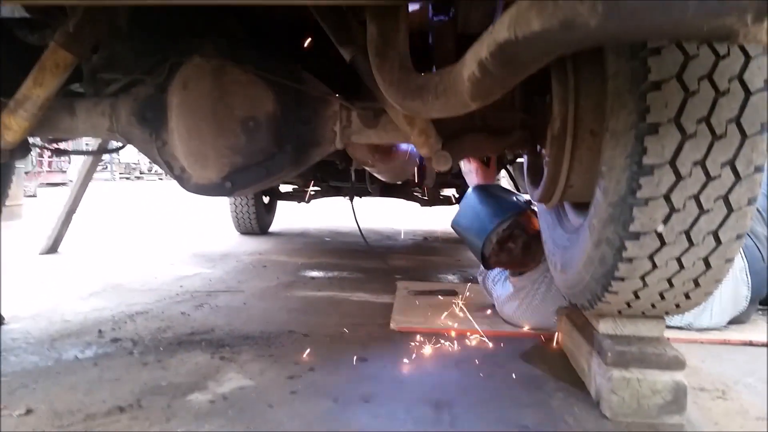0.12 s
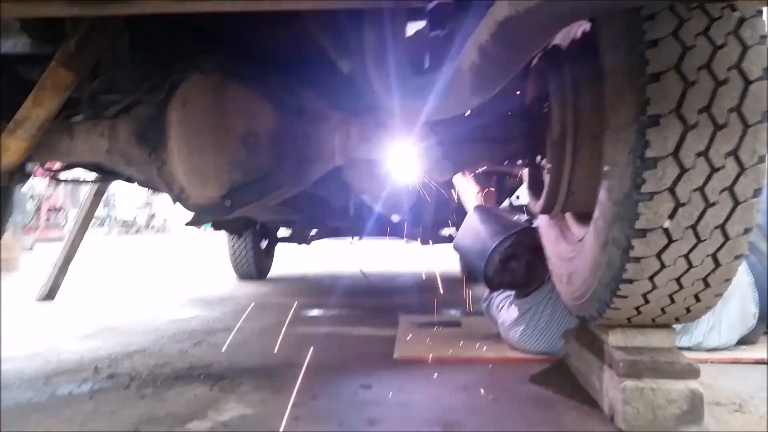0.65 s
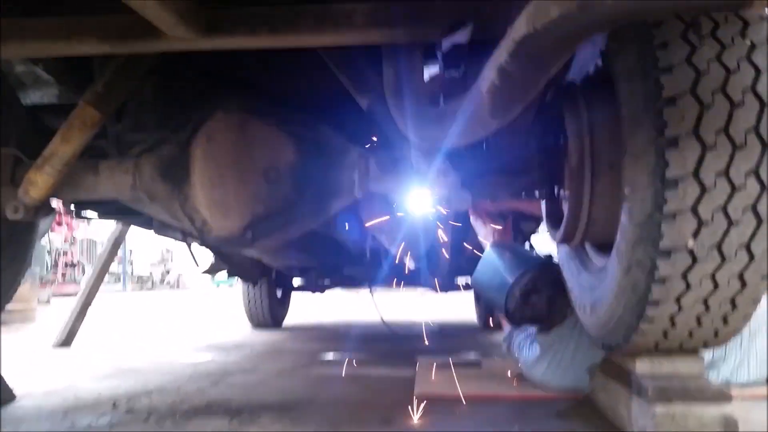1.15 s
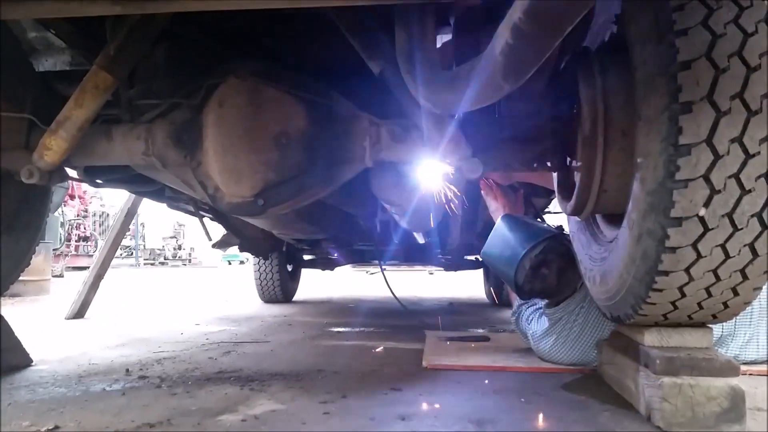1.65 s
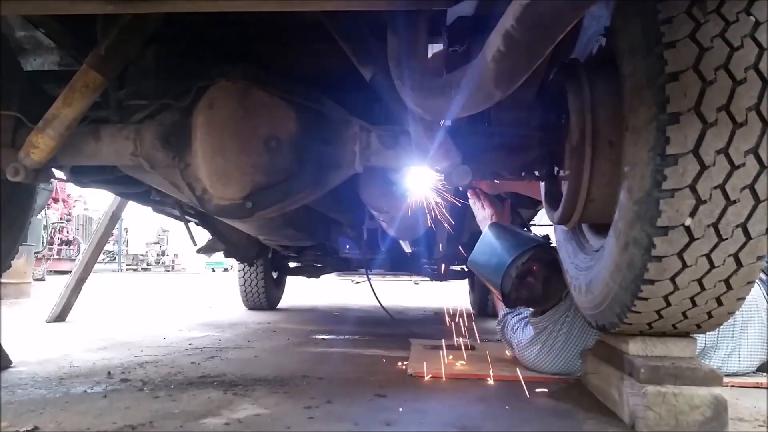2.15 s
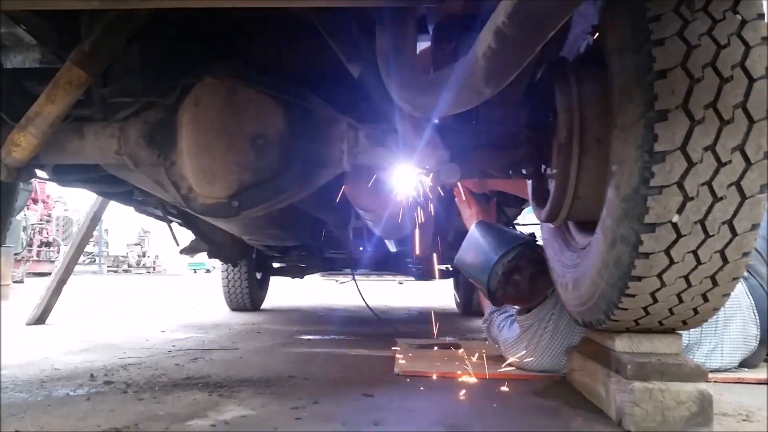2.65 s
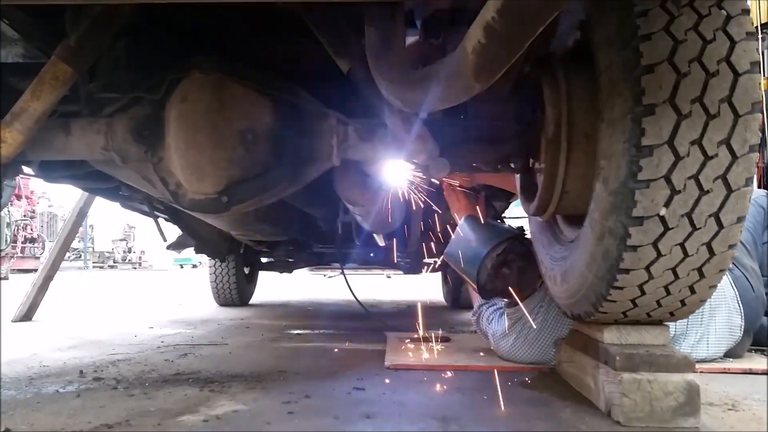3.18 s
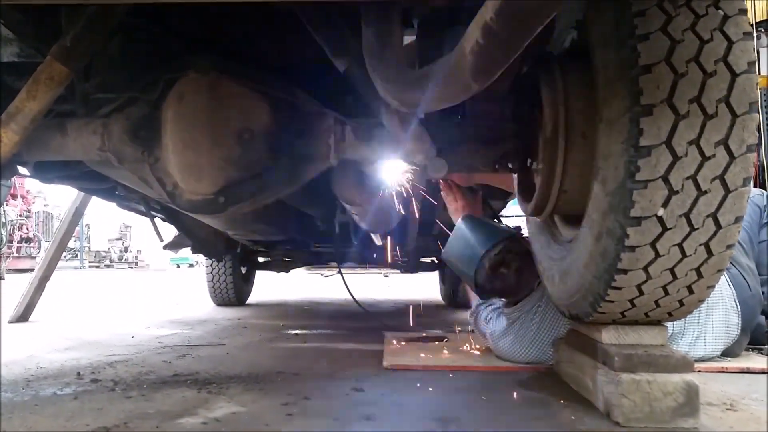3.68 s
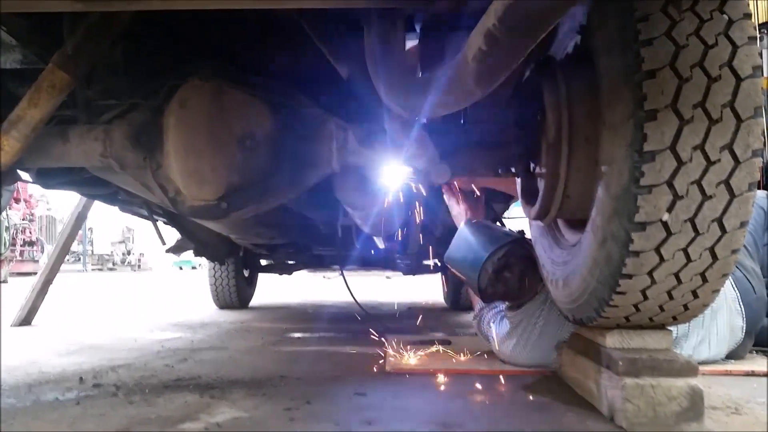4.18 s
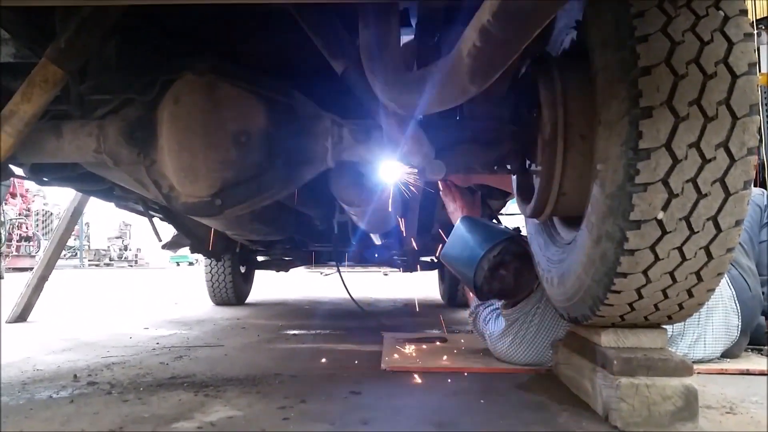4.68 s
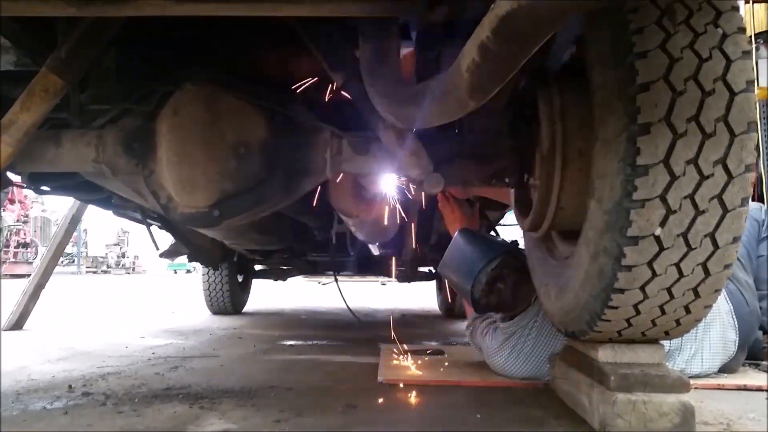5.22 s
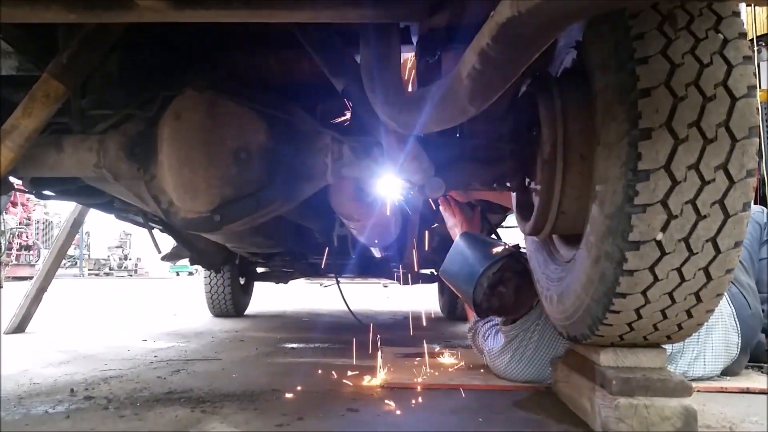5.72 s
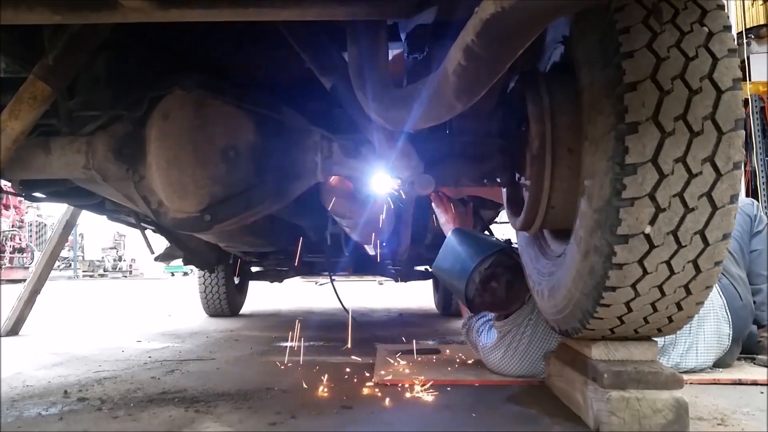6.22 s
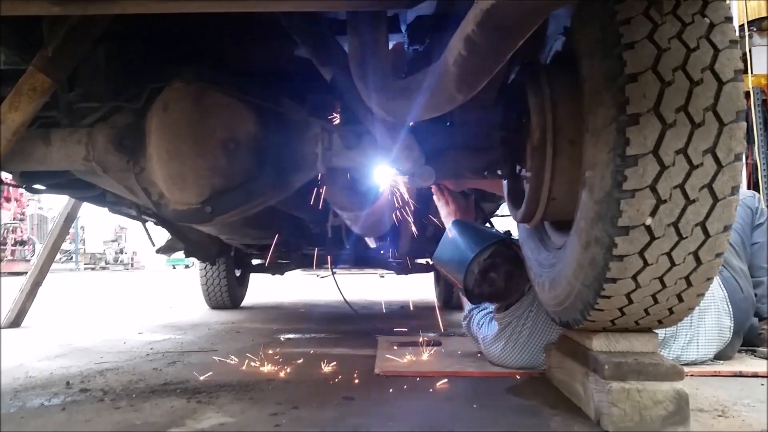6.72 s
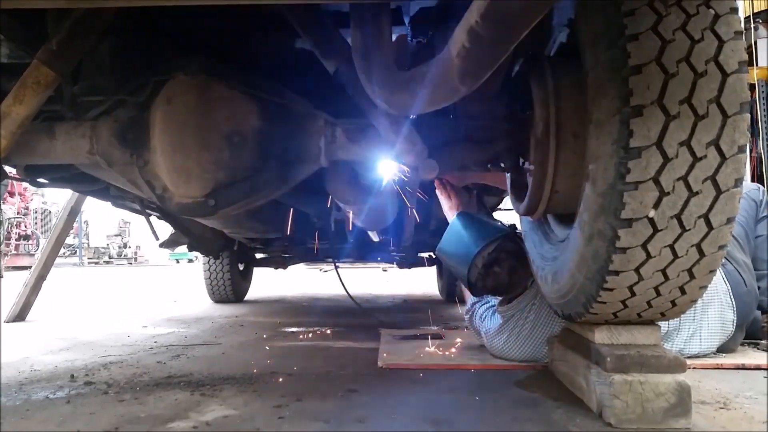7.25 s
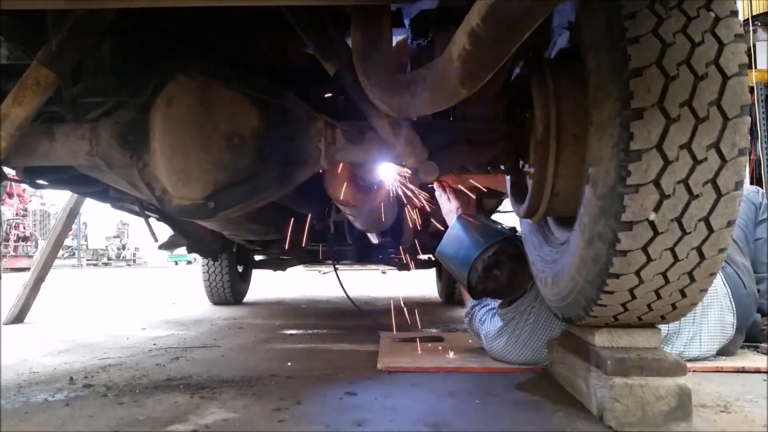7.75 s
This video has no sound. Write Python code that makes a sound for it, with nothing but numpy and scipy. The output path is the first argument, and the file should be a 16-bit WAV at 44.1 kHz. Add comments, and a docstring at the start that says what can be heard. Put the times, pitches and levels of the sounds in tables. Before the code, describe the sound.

An electric arc welds a steel pipe beneath a vehicle. A sizzling, frying hiss opens, quickly joined by irregular sharp snaps over dense, buzzing crackle. The arc dips for an instant before many snaps, then bursts back. Floor and chassis return short ragged echoes. The close stereo pickup is very bright and loud on the right, more muffled on the left, with soft air rumble and puffs early on; a yard murmurs very faintly behind.

```python
"""A sizzling, frying hiss comes first, soon cut by sharp snaps: an electric arc welds a steel pipe under a vehicle.
The snaps, small drops and crackle are pulses, the hiss and frying are shaped noise with wandering level and colour;
floor and chassis throw every pulse back as a burst of decaying noise. The right microphone port is bright and loud,
with low membrane ticks and brief smears of band noise; the left is muffled, with air puffs, rumble, soft buffets and
a hollow band. A faint murmur of yard and workshop lies behind; weak bands drop out and leave holes."""
import sys
import numpy as np
from scipy import signal
from scipy.fft import rfft, irfft, next_fast_len
from scipy.io import wavfile
from scipy.ndimage import uniform_filter1d, minimum_filter1d, map_coordinates

SR = 44100
rng = np.random.default_rng(int(sys.argv[2]) if len(sys.argv) > 2 else 0)


def inscribe(sig):
    """Save sig as 16-bit PCM at rate SR to the path in sys.argv[1].

    A 1-D sig is mono; a 2-D sig holds one channel per row.
    Samples are clipped to [-1, 1] before scaling.
    """
    pcm = np.round(np.clip(np.atleast_2d(sig).T, -1, 1) * 32767)
    wavfile.write(sys.argv[1], SR, pcm.astype(np.int16))


def field_ratio(decibels):
    """Amplitude ratio for a level in dB (20 dB per decade); scalars and array-likes work."""
    return 10 ** (np.asarray(decibels, dtype=float) / 20)


N = 347067  # samples

# Re-strikes of the arc: t/s, relative level/dB, length of the short circuit just before/s,
# level of the low kick on the right membrane/dB
RESTRIKES = [(0.179, -11, 0.022, -38), (0.2578, -8, 0.08, -46), (0.35, -7, 0.019, -39.5),
             (0.5183, -14.5, 0.023, -38), (0.633, -10, 0.0, -43), (0.6532, -5, 0.018, -32),
             (0.7335, -11.5, 0.043, -37), (0.7722, -12, 0.0, -42), (0.8946, -11.5, 0.088, -43),
             (0.9485, -2.5, 0.029, -22.5), (1.0767, -16, 0.035, -44.5), (1.0991, -10, 0.051, -55),
             (1.1334, -3.5, 0.036, -27.5), (1.2073, -9.5, 0.036, -35), (1.2888, -12.5, 0.069, -63),
             (1.6233, -10.5, 0.03, -37), (1.6718, -13.5, 0.023, -34.5), (1.7571, -5.5, 0.024, -35.5),
             (1.7752, -10.5, 0.044, -31.5), (1.811, -9, 0.023, -34), (1.9158, -1.5, 0.0016, -21.5),
             (1.9472, -12.5, 0, -31.5), (1.9553, -8, 0.0034, -25.5), (1.9887, -8, 0, -24.5),
             (2.026, -21, 0.031, -24.5), (2.0523, -9.5, 0.011, -48), (2.174, -5, 0.073, -36.5),
             (2.2262, -7, 0.026, -28), (2.2747, -4.5, 0.066, -26.5), (2.4102, -14, 0.05, -45),
             (2.4628, -1, 0.04, -23), (2.519, -12, 0.022, -44), (2.5372, -14, 0.019, -29.5),
             (2.5667, -8, 0.018, -24.5), (2.7047, -8, 0.0, -24.5), (2.7306, -7, 0.017, -28.5),
             (2.7737, -4, 0.077, -24), (2.8311, -3.5, 0.038, -24.5), (2.907, -14, 0.054, -41),
             (3.0697, -8, 0.023, -61), (3.127, -11.5, 0.035, -62), (3.187, 1.5, 0.061, -28.5),
             (3.231, -17, 0.015, -34.5), (3.264, -10, 0.032, -34.5), (3.2723, -4, 0.03, -34),
             (3.348, -9, 0.014, -53), (3.3594, -11.5, 0, -32), (3.3836, -2.5, 0.0056, -31.5),
             (3.4004, -7.5, 0.014, -26.5), (3.416, -7, 0, -35.5), (3.4256, -5, 0.068, -33),
             (3.4588, -8, 0.019, -30), (3.6649, -2.5, 0.085, -25.5), (3.7364, -14.5, 0.043, -52),
             (3.7609, -10.5, 0.02, -57), (3.817, -0.5, 0.038, -40), (3.8582, 3.5, 0.035, -19.5),
             (4.0434, -11, 0.015, -26), (4.0567, -3.5, 0.015, -30), (4.0999, -3.5, 0.0, -25),
             (4.1596, -6, 0.011, -49), (4.194, -9, 0.0063, -31.5), (4.2225, -1, 0.044, -30),
             (4.2494, -5, 0.055, -32), (4.3011, -13.5, 0.015, -67), (4.444, -4.5, 0.013, -25),
             (4.5184, -1, 0.03, -48), (4.7177, -13, 0.04, -59), (4.7881, -6.5, 0.084, -55),
             (4.812, -4.5, 0.025, -61), (5.0049, -10, 0.029, -41), (5.1843, -6, 0.03, -47),
             (5.3953, -9, 0.025, -30.5), (5.4551, -20, 0.034, -49.5), (5.501, -6, 0.033, -25.5),
             (5.5519, -4.5, 0.023, -19), (5.6179, -9.5, 0.024, -48), (5.6413, -3.5, 0.02, -28.5),
             (5.6846, -6.5, 0.021, -31.5), (5.7744, -5.5, 0.0025, -30), (5.8205, -6.5, 0.0, -27.5),
             (5.9601, -11.5, 0.035, -35.5), (6.055, -11.5, 0.034, -47), (6.1247, -6, 0.0025, -51),
             (6.2357, -7.5, 0, -31), (6.345, -13.5, 0, -36), (6.5596, -17, 0.032, -32),
             (6.6486, -9, 0.016, -29.5), (6.6875, -5, 0.011, -19), (6.701, -12, 0.0096, -26.5),
             (6.7172, -6.5, 0.054, -21), (6.793, -7, 0.03, -21), (6.8031, -5.5, 0.0082, -20.5),
             (6.9286, -13.5, 0.021, -56.5), (7.0046, -13, 0.019, -50), (7.4088, -16, 0.011, -48),
             (7.4369, -14.5, 0.04, -34.5), (7.5087, -6.5, 0.023, -39), (7.5722, -7.5, 0.05, -27),
             (7.6074, -16.5, 0.025, -54), (7.6495, -17, 0.017, -52), (7.6786, -6, 0.052, -25),
             (7.758, -12.5, 0.053, -46), (7.808, -11, 0.048, -41)]
# Duller spitting of the molten pool: t/s, relative level/dB
POOL_SPITTING = [(0.0, -31.5), (1.22, -89), (1.75, -37), (3.09, -55), (3.42, -31.5), (3.68, -48.5),
                 (4.21, -39.5), (6.25, -39.5), (7.3, -29), (7.87, -31.5)]


def unit(x):
    """Scaled to rms 1."""
    return x / np.sqrt(np.mean(x ** 2) + 1e-20)


def curve(rows):
    """One value per sample, by straight lines between (t/s, value) rows."""
    return np.interp(np.arange(N) / SR, *np.transpose(rows))


def wobble(rate):
    """A smooth random curve with this many knots a second."""
    knots = rng.standard_normal(int(N * rate / SR) + 4)
    return map_coordinates(knots, [np.arange(N) * rate / SR])


def coloured(x, points):
    """Causal (minimum-phase) filter through the given (f/Hz, gain/dB) points."""
    m = 2 * next_fast_len(N // 2 + 4096)
    f, db = np.transpose(points)
    log_hz = np.log(np.fft.rfftfreq(m, 1 / SR) + 1)
    cepstrum = irfft(np.log(field_ratio(np.interp(log_hz, np.log(f), db))), m)
    # folding the cepstrum onto positive time gives minimum phase
    cepstrum[1:m // 2] *= 2
    cepstrum[m // 2 + 1:] = 0
    return irfft(rfft(x, m) * np.exp(rfft(cepstrum)), m)[:N]


def spikes(s, size):
    """One-sample pulses at times s in seconds."""
    return np.bincount((np.asarray(s) * SR).astype(int), size, N + SR)[:N]


def patchy(depth_db):
    """Noise at rms 1 whose colour shifts in patches of time and pitch."""
    z = signal.stft(rng.standard_normal(N), nperseg=256)[2]
    field = uniform_filter1d(rng.standard_normal(z.shape), 5, 0)  # across pitch
    field = uniform_filter1d(field, 30, 1)  # along time
    return unit(signal.istft(z * field_ratio(depth_db * unit(field)), nperseg=256)[1][:N])


def band(x, hz, width_hz):
    """Noise x through one resonance applied twice, at rms 1."""
    b, a = signal.iirpeak(hz, hz / width_hz, SR)
    once = signal.lfilter(b, a, x)
    return unit(signal.lfilter(b, a, once))


def workshop():
    """The distant murmur of yard and workshop: separate patchy noise at each port."""
    # Colour of the murmur: f/Hz, relative level/dB
    yard_colour = [(25, -32), (130, 4.5), (250, 4), (500, -35), (800, -3.5), (1900, -49.5), (2600, -48),
                   (5000, -20), (9000, -41)]
    return np.array([field_ratio(db) * unit(coloured(patchy(depth_db=4.0), yard_colour)) for db in (-62, -68)])


def rumble():
    """Uneven low rumble of air at the left port: bass-heavy noise with a random swell."""
    # Strength of the rumble: t/s, level/dB
    breeze = [(0.0, -60), (0.46, -59), (0.99, -50), (1.75, -63.5), (2.04, -59.5), (3.03, -61), (4.2, -64),
              (4.7, -58.5), (5.0, -61), (5.81, -65), (7.15, -49), (7.87, -64)]
    low = coloured(rng.standard_normal(N), [(30, -10.5), (90, -1.5), (300, -9), (600, -34.0)])
    return field_ratio(curve(breeze)) * unit(field_ratio(2.44 * wobble(12)) * low)


def puffs():
    """Puffs of air press the left membrane out and back: a quickly fading swing at 190 Hz."""
    # Air puffs at the left port: t/s, peak level/dB
    gusts = [(0.818, -32), (0.888, -34), (0.933, -24.5), (0.979, -36), (1.042, -21.5), (1.114, -25.5),
             (1.175, -19), (1.571, -31), (1.972, -30)]
    s, db = np.transpose(gusts)
    t = np.arange(SR // 20) / SR
    swing = np.sin(2 * np.pi * 190 * t) * t / 0.0017 * np.exp(1 - t / 0.001)
    return signal.fftconvolve(spikes(s, field_ratio(db)), swing / swing.max())[:N]


def drone():
    """A hollow band on the left: resonant noise with a wavering level."""
    # Strength of the hollow band: t/s, level/dB
    hollow = [(0, -59), (2.0, -68.5), (6.4, -89), (7.3, -63)]
    waver_db = 2.5 * wobble(14)
    return field_ratio(curve(hollow) + waver_db) * band(rng.standard_normal(N), hz=725, width_hz=440)


def buffets():
    """Soft buffets: a few slow swings of the left membrane that swell and fade."""
    # Buffets on the left port: t/s, level/dB, f/Hz
    swings = [(4.671, -43, 90.5), (6.347, -40, 72), (6.786, -38.5, 64.6)]
    cycles = 3.4
    out = np.zeros(N)
    for s, db, hz in swings:
        turns = np.arange(round(cycles * SR / hz)) * hz / SR
        swell = np.sin(np.pi * turns / cycles)
        out[round(s * SR):][:len(turns)] += field_ratio(db) * np.sin(2 * np.pi * turns) * swell
    return out


def smears():
    """Brief smears of band noise on the right, each resonant noise around its own pitch."""
    # Smears on the right: t/s, length/s, f/Hz, level/dB
    smear_rows = [(1.914, .015, 260, -41.5), (2.039, 0.028, 610, -45), (3.304, 0.029, 1690, -47),
                  (3.457, 0.039, 5150, -45)]
    width = .6  # bandwidth over pitch
    out = np.zeros(N)
    for s, length_s, hz, db in smear_rows:
        n = round(length_s * SR)
        noise = band(rng.standard_normal(SR // 8), hz, width * hz)[-n:]
        out[round(s * SR):][:n] += field_ratio(db) * noise * signal.windows.tukey(n, .4)
    return out


def ticks():
    """Snaps kick the right membrane: a short low tick, mostly inward, with a ragged body; faint ticks join the frying."""
    # Colour of one tick: f/Hz, relative level/dB
    tick_colour = [(40, 8), (200, 7.5), (2000, 4), (2900, -9.5), (8500, -7), (10000, -22)]
    late_s = 0.0005  # the membrane follows the snap late
    rattle_db, rattle_t60_s = -22.5, 0.035  # ragged body relative to the kick
    faint_db = -3.5  # relative to the frying curve
    s, _, _, db = np.transpose(RESTRIKES)
    sign = np.where(rng.random(len(s)) < .7, -1, 1)
    kicks = spikes(s + late_s, sign * field_ratio(db))
    fading = field_ratio(rattle_db - 60 * np.arange(SR // 20) / SR / rattle_t60_s)
    body = signal.fftconvolve(abs(kicks), fading)[:N]
    rattle = body * rng.standard_normal(N) * field_ratio(4.12 * wobble(500))
    when, size = rng.random((2, 1600))
    clumps_db = 5 * wobble(25)
    faint = spikes(when * N / SR, size - .6) * field_ratio(curve(POOL_SPITTING) + faint_db + clumps_db)
    one = coloured(spikes([0], [1]), tick_colour)
    return coloured(kicks + rattle + faint, tick_colour) / abs(one).max()


def burning():
    """Relative level of the arc in dB: it sinks during each short circuit and is back at once with the snap."""
    # Steady burning as the hand moves along the joint: t/s, relative level/dB
    steady = [(0, -25.5), (.53, -32), (.8, -30), (1.36, -34), (1.6, -30), (1.9, -31), (2.1, -30),
              (2.85, -32), (3.1, -31.5), (3.4, -23.5), (3.7, -35), (4.0, -32.5), (4.43, -29.5), (5.2, -30),
              (5.5, -32.5), (6.1, -34.5), (6.9, -32), (7.4, -33.5), (7.87, -25.5)]
    fade_db_per_s, depth_db = 610, 11.5  # how fast and how far a shorted arc sinks
    lost_db = np.zeros(N)
    for s, _, short_s, _ in RESTRIKES:
        k = np.arange(round((s - max(short_s, 0)) * SR), round(s * SR))
        lost_db[k] = np.minimum(depth_db, fade_db_per_s * np.arange(len(k)) / SR)
    return curve(steady) - lost_db


def small_drops():
    """Small drops leave the wire: a loosely timed train of pulses that fills the time between the snaps."""
    # Stretches in which the drops come at the rate of the current ripple: start t/s, end t/s
    locked_spans = [(.53, .65), (1.39, 1.5), (1.74, 1.9), (2.3, 2.37), (5.36, 5.45), (6.35, 6.49)]
    drop_hz, ripple_hz = 63.75, 2 * 59.9  # nominal rates
    scatter_s, drop_db, spread_db = 0.001, 16.5, 3.5  # timing scatter; level over the burning and its spread
    snap_s = np.transpose(RESTRIKES)[0]
    late, more = rng.standard_normal((900, 2)).T
    t = np.arange(N) / SR
    locked = np.any([(t > a) & (t < b) for a, b in locked_spans], axis=0)
    turns = np.cumsum(np.where(locked, ripple_hz, drop_hz)) / SR
    marks = np.interp(np.r_[0, snap_s, N / SR], t, turns)
    # whole beats between snaps, so that every snap falls on a beat of the train
    beats = np.r_[0, np.cumsum(np.maximum(1, np.round(np.diff(marks))))]
    small = np.setdiff1d(np.arange(beats[-1]), beats).astype(int)
    drops_s = np.interp(np.interp(small, beats, marks), turns, t) + scatter_s * late[small]
    return spikes(drops_s, field_ratio(drop_db + spread_db * np.clip(more[small], -2, 1.5)))


def crackle():
    """Random pulses of uneven size, rippling with the current at twice the mains rate."""
    mains_hz = 59.9
    when, size = rng.random((2, 2500))
    spread_db = -4 * np.log(size + .03)
    ripple_db = 3 * np.cos(2 * np.pi * 2 * mains_hz * when * N / SR)
    return spikes(when * N / SR, field_ratio(spread_db + ripple_db))


def discharges():
    """Pulses of pressure from the arc: large snaps, and drops and crackle that follow the burning."""
    s, db = np.transpose(RESTRIKES)[:2]
    return spikes(s, field_ratio(db)) + (small_drops() + crackle()) * field_ratio(burning())


def underbody(pulses):
    """Each pulse crackles up, then returns as quick chassis echoes and a weaker, longer floor tail, never twice alike."""
    lead_s = 0.00076  # a discharge crackles up before its peak
    echo_db, echo_t60_s, tail_db, tail_t60_s = -4, 0.032, -7, 0.11  # tail level relative to the echoes
    t = np.arange(SR // 5) / SR
    decay = field_ratio(-60 * t / echo_t60_s) ** 2 + field_ratio(tail_db - 60 * t / tail_t60_s) ** 2  # power
    lead = np.exp(-t[::-1] / lead_s)
    power = signal.fftconvolve(pulses ** 2, np.r_[lead, decay])[len(t):][:N]
    ragged = unit(field_ratio(1.9 * wobble(1400)) * patchy(depth_db=4.0))
    return field_ratio(echo_db) * np.sqrt(abs(power)) * ragged


def hiss(flutter_db):
    """Steady hiss of the arc: patchy noise that follows the burning, with a fluttering level."""
    return field_ratio(burning() + 3 + flutter_db) * patchy(depth_db=5.0)  # 3 dB over the burning


def frying(sputter_db):
    """Duller spitting of the molten pool: filtered noise with a sputtering level."""
    noise = coloured(rng.standard_normal(N), [(400, 4.0), (6000, 7.5), (9000, -21)])
    return field_ratio(curve(POOL_SPITTING) + sputter_db) * unit(noise)


def reflected(x):
    """Direct sound plus near reflections of wandering delay and strength: bands drift through the treble."""
    # Reflections off axle, tyre and floor: delay/ms, level relative to the direct sound/dB
    echoes = [(0.698, -14.5), (1.378, -18.5), (2.829, -10), (4.001, -11.5), (5.502, -13), (7.502, -16)]
    drift_ms, swing_db = .12, 4  # the arc moves along the joint, so the paths wander
    hz, t, z = signal.stft(x, SR, nperseg=4096)
    at = np.minimum(t * SR, N - 1).astype(int)
    paths = 1
    for ms, db in echoes:
        strength = field_ratio(db + swing_db * wobble(0.86)[at])
        delay_s = (ms + drift_ms * wobble(.6)[at]) / 1000
        paths = paths + strength * np.exp(-2j * np.pi * np.outer(hz, delay_s))
    evened = paths / np.sqrt(np.mean(abs(paths[hz > 12000]) ** 2, axis=0))  # holds the treble gain steady
    return signal.istft(z * evened, SR, nperseg=4096)[1][:N]


def arc():
    """Snaps, crackle, hiss and frying at both ports; the left port lies a little farther away."""
    # Response of each port to the arc: f/Hz, relative gain/dB
    left_response = [(300, -30.5), (1950, -35), (2700, -47.5), (4000, -35), (4900, -25.5), (5800, -33.5),
                     (6800, -43), (8000, -33), (11500, -32.5), (13500, -19.5), (15720, -28.5), (15860, -68),
                     (17000, -84)]
    right_response = [(300, -34.5), (2500, -43.5), (5000, -44.5), (6800, -45), (8300, -45), (9500, -24),
                      (11000, -20), (12500, -11), (14000, -4), (14700, -4), (15720, -4.5), (15900, -34),
                      (17000, -53)]
    pulses = discharges()
    flutter_db = 1.4 * wobble(110) + 3 * wobble(600)
    sputter_db = 3 * wobble(60) + 4.5 * wobble(350)
    direct = field_ratio(17.5) * pulses
    shared = direct + underbody(pulses) + hiss(flutter_db)
    apart = underbody(pulses) + hiss(flutter_db)  # heard at the left port only
    farther = np.roll(shared, 4)  # delay in samples
    left = coloured(0.2 * farther + 0.6 * apart + frying(sputter_db), left_response)
    right = coloured(shared + frying(sputter_db), right_response)
    return field_ratio(7.0) * np.array([reflected(left), reflected(right)])


def scene():
    """All sources, left and right."""
    left_only = rumble() + puffs() + drone() + buffets()
    right_only = ticks() + smears()
    return workshop() + np.array([left_only, right_only]) + arc()


def with_holes(x):
    """Weak bands of the lower range and the top edge drop out, leaving holes; sudden clicks on the right stay whole."""
    low_hz, edge_hz = 9300, 15850  # holes fall below the first and above the second
    weak_db = np.array([-34, -53])  # left, right: a band weaker than this against the whole sound drops out
    click_rise_db, whole_s = 11.5, .005  # rise of a click over the running level; stretch kept whole around it
    width = 3  # bins a band
    hz, _, z = signal.stft(x, SR, nperseg=2048)
    power = abs(z) ** 2
    bands = np.add.reduceat(power, np.arange(0, len(hz), width), axis=1) / width
    bands = np.repeat(bands, width, axis=1)[:, :len(hz)]
    weak = bands < power.sum(axis=1, keepdims=True) * field_ratio(weak_db)[:, None, None] ** 2
    covered = ((hz < low_hz) | (hz > edge_hz))[:, None]
    holed = signal.istft(z * ~(weak & covered), SR, nperseg=2048)[1][:, :N]
    # clicks are sought in the power of a duller copy of the right side
    dull = uniform_filter1d(uniform_filter1d(x[1], size=3), size=4) ** 2
    running = uniform_filter1d(dull, size=3000)
    sudden = uniform_filter1d(dull, size=30) > running * field_ratio(click_rise_db) ** 2
    away = minimum_filter1d(1. - sudden, size=round(whole_s * SR))  # 1 away from clicks
    away = uniform_filter1d(away, size=66)
    return np.array([holed[0], away * holed[1] + (1 - away) * x[1]])


def band_limit(x):
    """A steep low-pass at the top of the band."""
    return signal.sosfilt(signal.butter(12, 16990, fs=SR, output="sos"), x)


def record(dry):
    """A fast limiter holds the peaks; the port bends, so the snaps' envelope enters the bass; weak bands drop out."""
    needed = np.minimum(1, .8 / (abs(dry) + 1e-9))
    held = dry * uniform_filter1d(minimum_filter1d(needed, size=41), size=41)
    bent = held - 0.064 * held ** 2
    hz = np.fft.rfftfreq(N, 1 / SR)
    bass_cut = hz ** 2 / (hz ** 2 + 35 ** 2)
    kept = irfft(rfft(bent) * (hz < 16990) * bass_cut, N)
    return band_limit(with_holes(kept))


dry = scene()
out = record(dry)
inscribe(out)
```